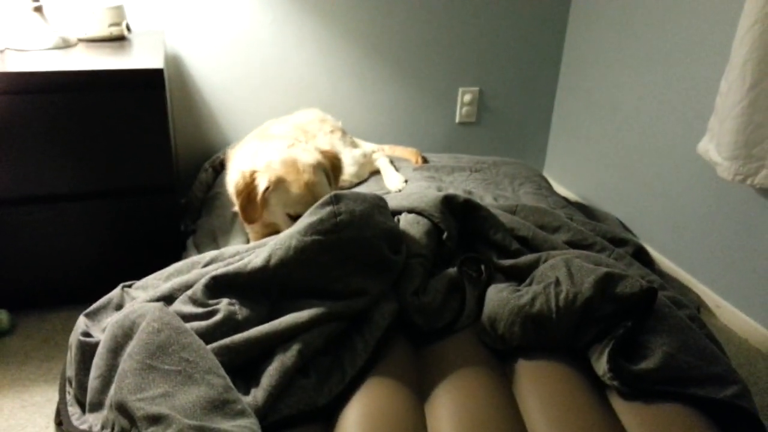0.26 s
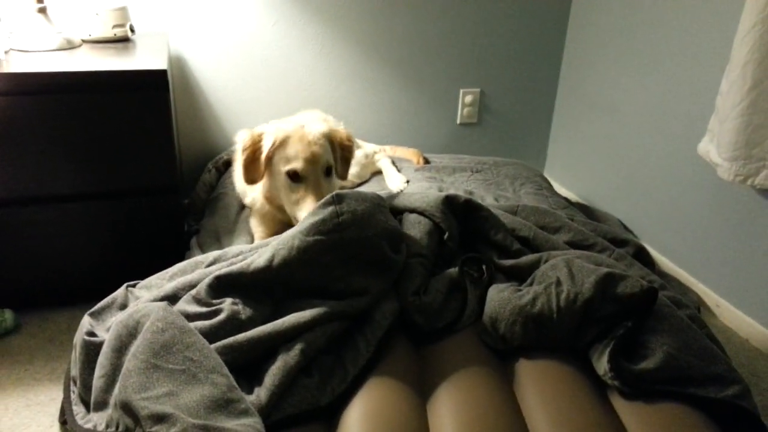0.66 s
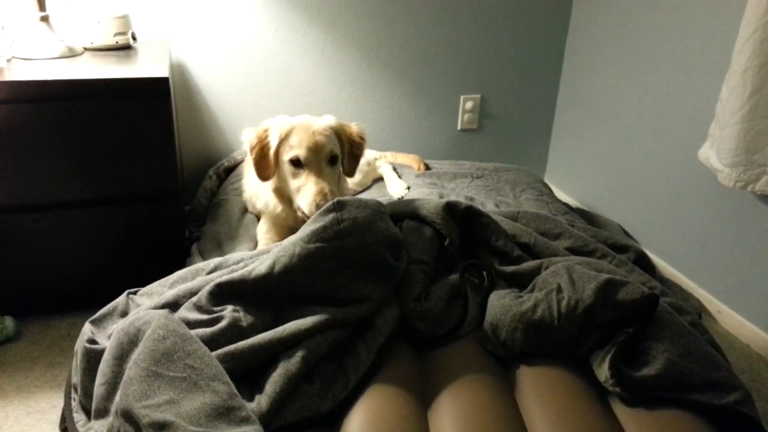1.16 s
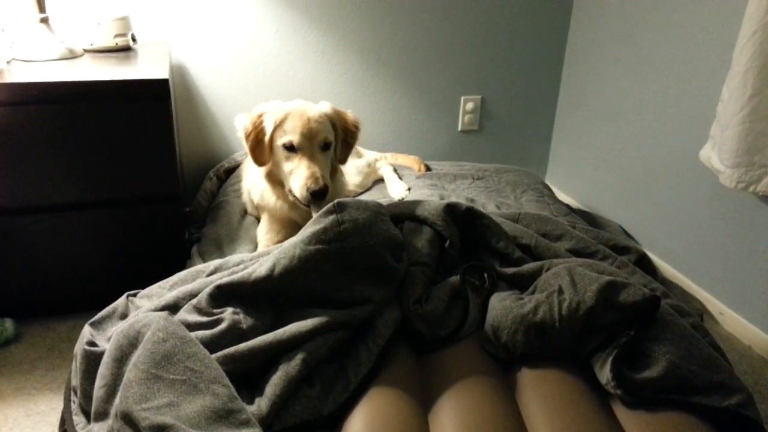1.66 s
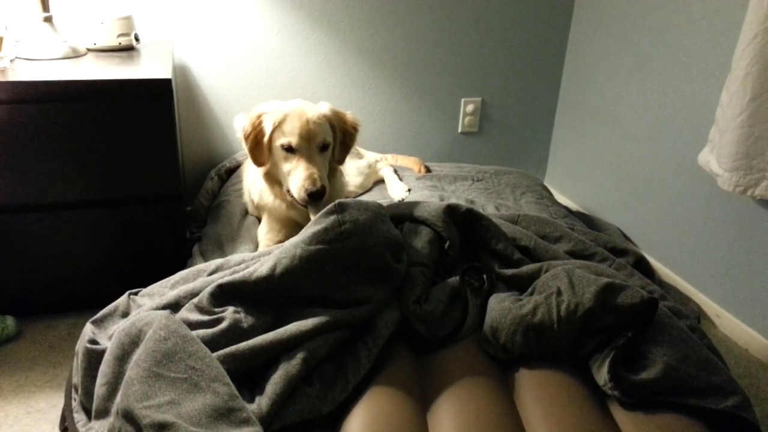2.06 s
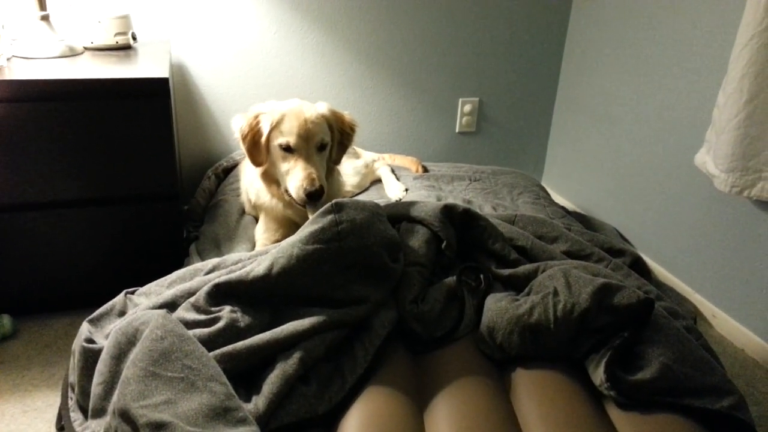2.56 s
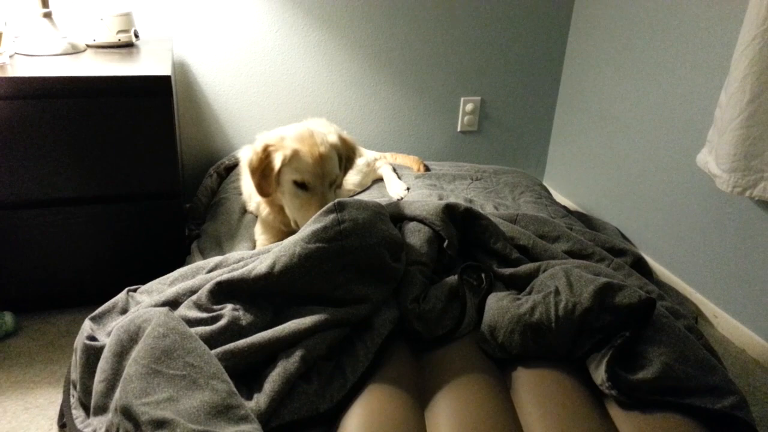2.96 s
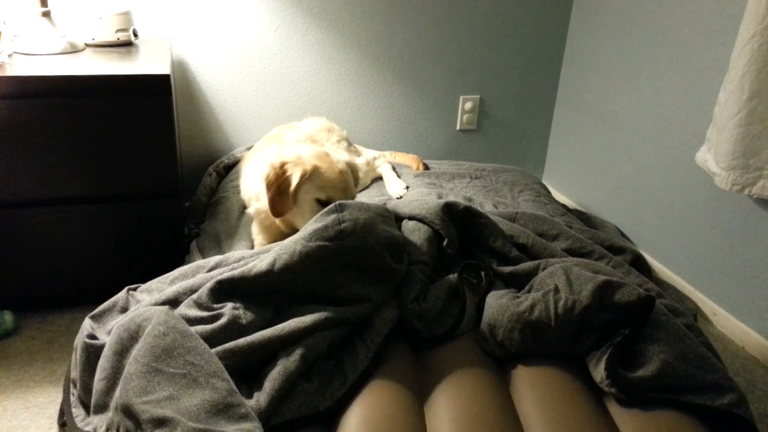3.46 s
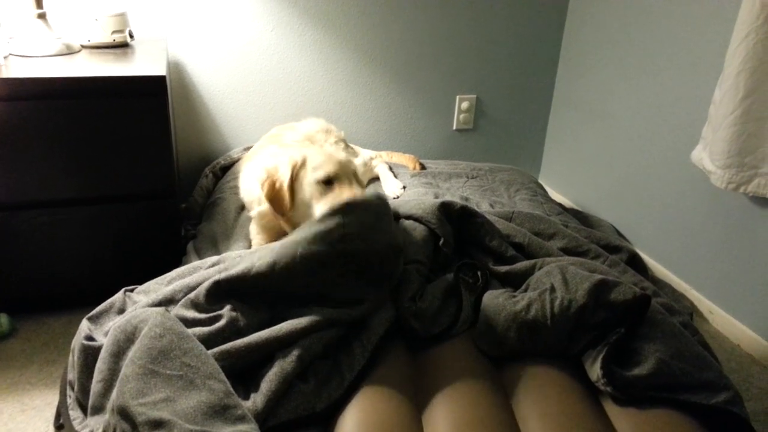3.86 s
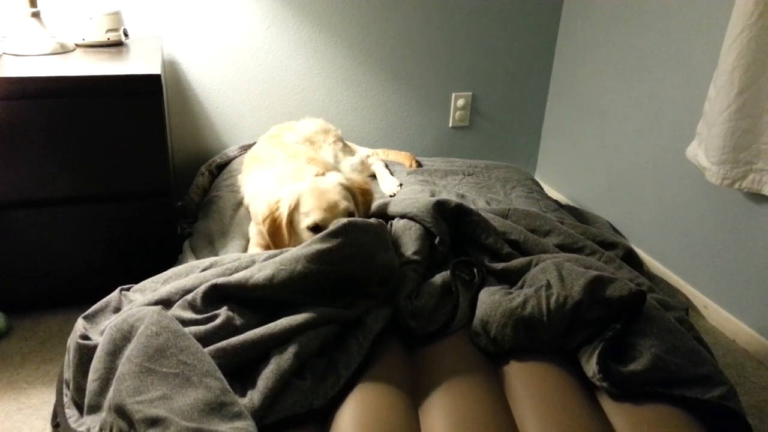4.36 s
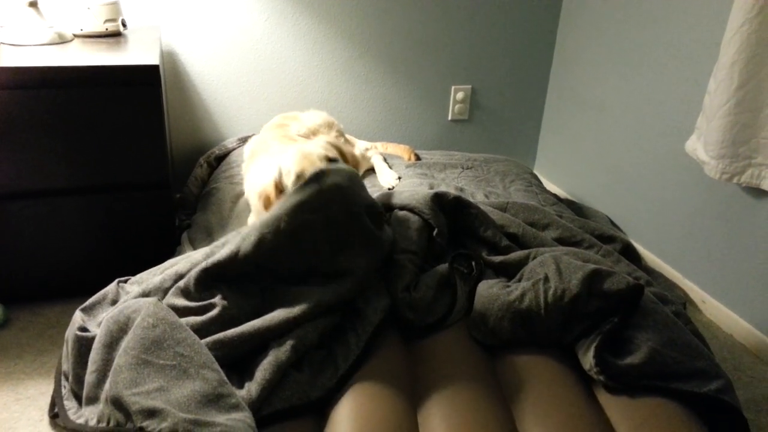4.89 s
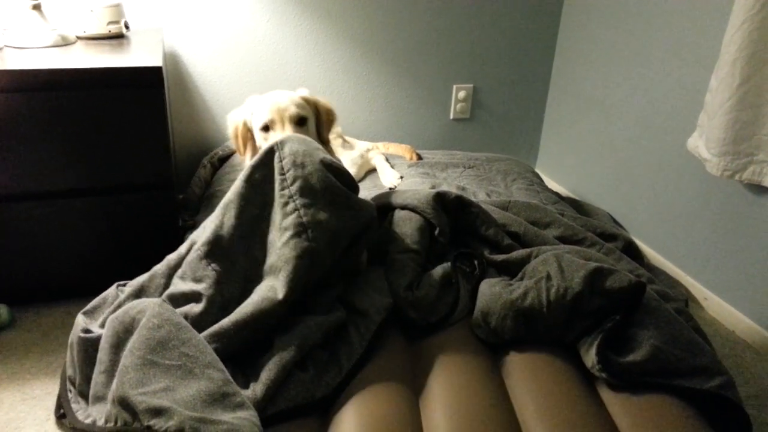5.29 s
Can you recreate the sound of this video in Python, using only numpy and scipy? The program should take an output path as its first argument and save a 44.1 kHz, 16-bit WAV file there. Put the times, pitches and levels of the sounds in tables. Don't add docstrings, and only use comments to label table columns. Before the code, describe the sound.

Air hisses steadily from an open mattress valve in a quiet bedroom, with soft bumps and taps, then bursts into a loud fluttering rush.

```python
import sys
import numpy as np
from scipy import signal
from scipy.fft import rfft, irfft, next_fast_len
from scipy.io import wavfile
from scipy.ndimage import uniform_filter1d, map_coordinates

SR = 44100
rng = np.random.default_rng(int(sys.argv[2]) if len(sys.argv) > 2 else 0)


def int16_out(signal):
    q = np.round(np.clip(np.atleast_2d(signal).T, -1, 1) * 32767)
    wavfile.write(sys.argv[1], SR, q.astype(np.int16))


def gain_from_db(level_db):
    decades = np.asarray(level_db, float) / 20
    return 10 ** decades


N = 243873


def unit(x):
    return x / np.sqrt(np.mean(x ** 2) + 1e-20)


def along(points, hz):
    f, v = np.transpose(points)
    return np.interp(np.log(hz + 1), np.log(f + 1), v)


def curves(rows):
    s, *columns = np.transpose(rows)
    return [np.interp(np.arange(N) / SR, s, column) for column in columns]


def ramp(start_s, lasts_s):
    return np.clip((np.arange(N) / SR - start_s) / lasts_s, 0, 1)


def wobble(rate):
    knots = rng.standard_normal(int(N * rate / SR) + 4)
    return map_coordinates(knots, [np.arange(N) * rate / SR])


def filtered(x, response):
    m = next_fast_len(N + SR // 2)
    return irfft(rfft(x, m) * response(np.fft.rfftfreq(m, 1 / SR)), m)[..., :N]


def modes(table):
    def response(f):
        total = 0
        for k, (centre, width, db) in enumerate(table):
            damping = 1j * f * width
            total = total + (-1) ** k * gain_from_db(db) * damping / (centre * centre - f * f + damping)
        return total
    return response


def colour(points):
    return lambda hz: gain_from_db(along(points, hz))


def turbulence(response, patchy_db):
    z = signal.stft(rng.standard_normal((2, N)), nperseg=512)[2]
    patches = uniform_filter1d(rng.standard_normal(z.shape[1:]), size=5, axis=0)
    patches = uniform_filter1d(patches, size=8, axis=1)
    noise = signal.istft(z * gain_from_db(patchy_db * unit(patches)), nperseg=512)[1][:, :N]
    return unit(filtered(noise, response))


# frequency_hz [Hz], density_db [dB per Hz]
ROOM_SPECTRUM = [(15, -49), (25, -8), (96, 0.5), (277, 1), (419, -5), (475, 0), (539, -8), (854, -11),
                 (1100, -5), (1430, -50), (2420, -120)]


def room_tone():
    return gain_from_db(-56.5 + 0.93 * wobble(8.0)) * turbulence(colour(ROOM_SPECTRUM), patchy_db=3.0)


# start_s [s], level_db [dB]
SLOW_PRESSURE = [
    (0, 3.5),
    (0.38, 4.5),
    (0.44, 2),
    (1.66, 0.5),
    (1.74, 1),
    (1.92, 0.5),
    (2.1, -2),
    (2.74, -4.5),
    (4.9, -1),
]
# start_s [s], surge_db [dB], sag_before_db [dB]
WEIGHT_SHIFTS = [
    (2.78, 7, -1),
    (3.235, 8, -1),
    (3.685, 4, 1),
    (4.06, 1, 0),
    (4.17, 1.5, 2.5),
    (4.505, 4, 2.5),
    (4.76, 1.5, -0.5),
]


def pressure_db():
    lift_s, press_s, ease_s = 0.07, 0.021, 0.19
    push_db, = curves(SLOW_PRESSURE)
    t = np.arange(N) / SR
    for start_s, surge_db, sag_db in WEIGHT_SHIFTS:
        landed = ramp(start_s, press_s)
        surge = landed * surge_db * np.exp(-np.maximum(t - start_s, 0) / ease_s)
        sag = sag_db * ramp(start_s - lift_s, lift_s / 2) * (1 - landed)
        push_db = push_db + surge - sag
    return push_db


# frequency_hz [Hz], density_db [dB per Hz]
NECK_HISS = [(410, -24), (700, -7.5), (971, -14), (1260, -3.5), (1520, -1), (2420, -4), (2750, 0),
             (2980, -6), (4850, -3.5), (5250, -4.5), (5620, -24), (6530, -13.5), (7500, -7), (9750, -50),
             (16500, -120)]
# frequency_hz [Hz], density_db [dB per Hz]
JET_FIZZ = [(3240, -8.5), (5500, -3.5), (5660, -6), (6550, -8.5), (7720, -7.5), (8360, -0.5), (8980, -2.5),
            (9730, -1.5), (11700, -2.5), (13200, -4), (14300, -7)]
# pitch_hz [Hz], width_hz [Hz], level_db [dB]
EDGE_TONES = [(1500, 430, -3), (2697, 70, 3.5), (3810, 150, -4), (4487, 48, 1.5), (5220, 310, -3.5)]


def leak():
    push_db = pressure_db()
    neck_db = -52 + 0.43 * push_db + 0.5 * np.arange(N) / SR
    jet_db = -48 + push_db
    unsteady_db = .2 * wobble(5) + .55 * wobble(11)
    tones = gain_from_db(-5.0) * turbulence(modes(EDGE_TONES), patchy_db=1.0)
    hiss = gain_from_db(-0.5) * turbulence(colour(NECK_HISS), patchy_db=1.4)
    neck = gain_from_db(neck_db + 5.0 + unsteady_db) * (hiss + tones)
    jet_gain = gain_from_db(jet_db + 4 + 2.5 * unsteady_db + 0.14 * wobble(5.9))
    jet = jet_gain * turbulence(colour(JET_FIZZ), patchy_db=1.0)
    jet = jet * gain_from_db(-4 * ramp(5.03, .08))
    return neck + jet


# start_s [s], peak_db [dB], pitch_hz [Hz]
BLANKET_FOLDS = [(0.322, -17.5, 450), (0.3309, -20, 400), (0.339, -30, 400), (0.344, -36, 420),
                 (0.349, -34, 330), (0.362, -32.5, 260), (0.378, -37, 330), (0.515, -32, 314),
                 (0.524, -42, 300), (0.536, -32.5, 495), (0.547, -40, 270), (0.583, -40, 250)]
# start_s [s], peak_db [dB], pitch_hz [Hz], claw_snap_db [dB]
PAWS = [(0.686, -40, 680, -10), (1.459, -47, 320, -3), (2.062, -42, 160, -15), (2.142, -39, 300, -9),
        (2.649, -41, 649, 2), (2.709, -33, 418, -4), (3.027, -37, 320, 1), (3.267, -37.5, 437, 4),
        (3.32, -32, 630, 3.5), (3.421, -31.5, 283, 2), (3.433, -38, 260, -7), (3.449, -34, 409, -2),
        (3.695, -31, 540, 5), (3.822, -41, 670, -8), (3.952, -35.5, 294, 4.5), (4.0815, -29, 640, -3),
        (4.0846, -25, 640, 4), (4.177, -34.5, 600, -7), (4.199, -41, 638, -17), (4.216, -38, 640, -15),
        (4.317, -37, 266, -17), (4.422, -38, 576, 0), (4.524, -34, 520, -5), (4.618, -32, 355, -7),
        (4.64, -44, 400, 8), (4.691, -31.5, 310, -2), (4.783, -29.5, 730, 10), (4.844, -40, 369, -2),
        (4.939, -39, 600, 3)]
# pitch_hz [Hz], width_hz [Hz], level_db [dB]
DRUM_NOTES = [(257, 68, 3), (640, 20, 10)]
# pitch_hz [Hz], width_hz [Hz], level_db [dB]
SKIN_SNAP = [(1285, 240, 2.5), (1800, 310, 1.5), (2660, 130, 5)]


def taps():
    drum, skin = np.zeros(N + SR), np.zeros(N + SR)
    t = np.arange(SR // 5) / SR
    # snap dB, rattle over push
    contacts = [(*fold, -13.5, 0.12) for fold in BLANKET_FOLDS] + [(*paw, 0.18) for paw in PAWS]
    for start_s, peak_db, hz, snap_db, loose in contacts:
        push_hz = hz * (640 / hz) ** 0.31
        push = gain_from_db(-60 * t / 0.0079) * np.sin(2 * np.pi * push_hz * t) * (1 - np.exp(-t / 0.00059))

        rattle_t60_s = max(0.072 * (300 / hz) ** 0.4, .01)
        band = signal.butter(2, [.6 * hz, 2.4 * hz], "band", fs=SR, output="sos")
        rattle = unit(signal.sosfilt(band, rng.standard_normal(len(t))))
        tail = loose * gain_from_db(-60 * t / rattle_t60_s) * (1 - np.exp(-t / 0.0028)) * rattle
        drum[round((start_s + .0008) * SR):][:len(t)] += gain_from_db(peak_db + 6.0) * (push + tail)

        snap = gain_from_db(peak_db + snap_db + 6 - 60 * t / 0.012) * (1 - np.exp(-t / .0015))
        skin[round((start_s + .002) * SR):][:len(t)] += snap * rng.standard_normal(len(t))
        skin[round((start_s + .003) * SR)] += gain_from_db(peak_db + snap_db + 25.5)
    dull = filtered(drum[:N], lambda f: (1j * f / (110 + 1j * f)) ** 2 * (1 + modes(DRUM_NOTES)(f)))
    return dull + filtered(skin[:N], lambda f: modes(SKIN_SNAP)(f) / (1 + 1j * f / 3500))


# start_s [s], peak_db [dB], pitch_hz [Hz]
FLAP_SLAPS = [(4.957, -13, 523), (4.967, -9, 1630), (4.982, 1, 1413), (4.993, 0, 1517), (5.004, 2.5, 1380),
              (5.03, -6, 1560), (5.061, -6, 1410), (5.1, -1, 1543), (5.134, -10, 1500), (5.166, -1, 1295),
              (5.228, -10, 673), (5.255, -7, 1800), (5.27, -9, 1795), (5.279, -8, 1794), (5.286, 2, 1713),
              (5.311, -12, 1500), (5.329, -9, 1030), (5.345, -8, 1523), (5.377, -10.5, 1520),
              (5.404, -16, 1480)]


def flaps():
    out, t = np.zeros(N + SR), np.arange(SR // 20) / SR
    for start_s, peak_db, hz in FLAP_SLAPS:
        envelope = gain_from_db(peak_db - 9.0 - 60 * t / 0.048) * (1 - np.exp(-t / 0.00056))
        out[round(start_s * SR):][:len(t)] += envelope * np.sin(2 * np.pi * hz * t)
    return out[:N]


SQUEEZE_S, SWELL_S, START_DB = 4.953, 0.047, -19


def flow_db():
    after_s = np.maximum(np.arange(N) / SR - SQUEEZE_S - SWELL_S, 0)
    sag_db = 15.5 * (1 - np.exp(-after_s / 0.23))
    return START_DB * (1 - ramp(SQUEEZE_S, SWELL_S)) ** 2 - sag_db


# start_s [s], focus_db [dB], pitch_hz [Hz]
MOUTH_SHAPE = [
    (4.95, -10, 1500),
    (5.004, 3.5, 1478),
    (5.03, 0, 1507),
    (5.165, 8, 1386),
    (5.222, -1.5, 1460),
    (5.286, 5.5, 1660),
    (5.305, 0.5, 1510),
    (5.43, -0.5, 1500),
    (5.53, 2.5, 1500),
]
# pitch_hz [Hz], width_hz [Hz], level_db [dB]
CAVITY = [(218, 246, -12), (384, 260, -8), (655, 116, 1.5), (1080, 200, -0.5)]
# pitch_hz [Hz], width_hz [Hz], level_db [dB]
VALVE_LIP = [(1920, 270, -0.5), (2906, 340, 2.5)]
# frequency_hz [Hz], density_db [dB per Hz]
RUSH_FIZZ = [(2500, -27), (3400, -6), (4000, -6), (4500, -1), (5100, -6), (5800, -10.5), (7000, -11.5),
             (9000, -15.5), (11000, -19), (14300, -23.5)]


def rush():
    flow = flow_db()
    focus_db, mouth_hz = curves(MOUTH_SHAPE)

    steps = np.array([1250, 1500, 1750])
    distance = abs(np.clip(mouth_hz, steps[0], steps[-1]) - steps[:, None])
    shares = np.clip(1 - distance / (steps[1] - steps[0]), 0, 1)
    mouth = 0
    for share, hz in zip(shares, steps):
        mouth = mouth + np.sqrt(share) * turbulence(lambda f: modes([(hz, 380, 0)])(f) ** 2, patchy_db=1.0)

    cavity_db = -18 + 0.35 * flow + START_DB * (1 - ramp(SQUEEZE_S, SWELL_S)) / 2
    cavity_db = cavity_db - 9.5 * ramp(5.2, 0.12)

    flutter = unit(gain_from_db(0.57 * wobble(70) + 0.5 * wobble(220)))
    body = gain_from_db(-11.5 + flow + focus_db) * mouth
    body = body + gain_from_db(cavity_db) * turbulence(modes(CAVITY), patchy_db=2.0)
    body = body + gain_from_db(-11 + flow) * turbulence(modes(VALVE_LIP), patchy_db=0.6)
    roar = turbulence(modes([(1740, 1000, 0)]), patchy_db=2.5)
    body = body + gain_from_db(-14.5 + 1.37 * flow) * roar
    body = filtered(body, lambda hz: 1 / (1 + 1j * hz / 3500) ** 2)

    fizz = flutter ** 0.4 * turbulence(colour(RUSH_FIZZ), patchy_db=1.4)
    fizz = gain_from_db(-19.5 + 0.83 * flow) * fizz
    return ramp(SQUEEZE_S, 0.0039) * gain_from_db(-1.5) * (flutter * body + fizz)


# frequency_hz [Hz], t60_s [s]
ROOM_DECAY = [(150, 0.47), (1000, 0.17), (5000, 0.086)]


def bedroom(x):
    hz, t, z = signal.stft(rng.standard_normal((2, SR // 2)), SR, nperseg=256)
    decay = gain_from_db(-60 * t / along(ROOM_DECAY, hz)[:, None])
    tail = signal.istft(z * decay, SR, nperseg=256)[1]
    delayed = np.pad(x, (300, 0))[None]
    return signal.fftconvolve(delayed, tail / np.linalg.norm(tail[0]), axes=1)[:, :N]


# frequency_hz [Hz], difference_db [dB]
BALANCE = [(700, 0), (1380, -1), (2100, -8), (2750, -3.5), (3600, 0.5), (4800, -0.5), (5500, -5.5),
           (6300, 0.5), (8500, 2), (11200, 4), (12100, 4), (14000, 7)]
# frequency_hz [Hz], lead_rad [radians]
LEAD = [(700, .2), (1500, 0), (2700, .5), (3400, 1.8), (5100, 1.1), (6500, 3), (9000, 3.2), (10300, 4.6),
        (11000, 3.2), (12400, 4.6), (14000, 9.4)]


def ports(pair, alike):
    def blend(hz):
        angle = np.arccos(np.clip(along(alike, hz), 0, 1)) / 2
        return np.array([np.cos(angle), np.sin(angle)])

    def port_pair(hz):
        left = gain_from_db(along(BALANCE, hz) / 2) * np.exp(.5j * along(LEAD, hz))
        return np.array([left, 1 / left])

    shared, apart = filtered(pair, blend)
    return filtered(np.array([shared + apart, shared - apart]), port_pair)


# frequency_hz [Hz], likeness [0-1]
LEAK_LIKENESS = [(60, 0.8), (500, 0.06), (1400, 0.68), (2300, 0.56), (4500, 0.22), (7500, 0.51),
                 (8400, 0.35), (9600, 0.47), (10800, .1), (12000, 0.6), (14000, 0.1)]
# frequency_hz [Hz], likeness [0-1]
NEAR_LIKENESS = [(50, 0.3), (130, 0.97), (300, 0.9), (1600, 0.72), (2400, 0.46), (4000, 0.5), (7200, 0.38),
                 (9500, 0.18), (12000, 0.1)]


def scene():
    far = room_tone() + leak()
    tap, flap = taps(), flaps()
    direct = (tap + flap) * [[1], [0]]
    near = rush() + direct + gain_from_db(-13.0) * bedroom(tap) + gain_from_db(-2.5) * bedroom(flap)
    return ports(far, LEAK_LIKENESS) + ports(near, NEAR_LIKENESS)


# frequency_hz [Hz], share [0-1]
TREBLE_GAPS = [(8500, 0), (10500, .15), (12500, .35), (14400, .55)]


def treble_gaps(x):
    hz, t, z = signal.stft(x, SR, nperseg=512)
    luck = np.repeat(rng.standard_normal((1, 65, len(t))), 4, axis=1)[:, :len(hz)]
    luck = uniform_filter1d(luck, size=12, axis=2)
    rank = .5 + .5 * np.tanh(.85 * unit(luck))
    port_share = np.array([.8, 1.6])[:, None, None]
    share = along(TREBLE_GAPS, hz)[:, None] * port_share * np.clip((t - 4.96) / .12, 0, 1)
    return signal.istft(z * (rank > share), SR, nperseg=512)[1][:, :N]


def roll_off(x):
    return signal.sosfilt(signal.butter(12, 14450, fs=SR, output="sos"), x)


def record(dry):
    heard = filtered(dry, lambda hz: (1j * hz / (90 + 1j * hz)) ** 2)
    mix = treble_gaps(np.clip(heard, -1, 1))
    return roll_off(mix)


dry = scene()
out = record(dry)
int16_out(out)
```